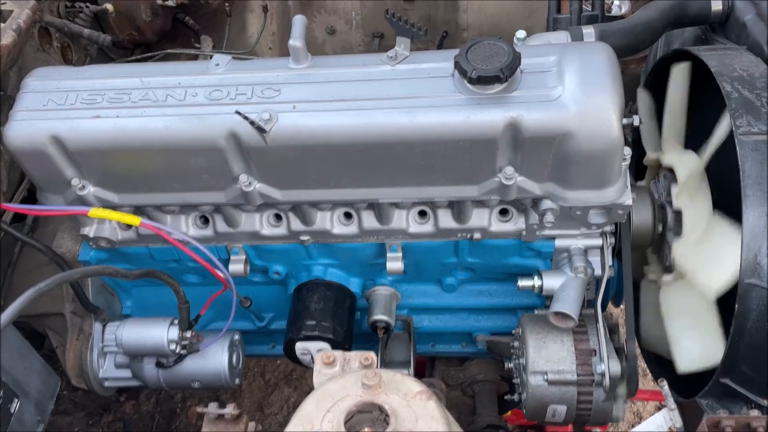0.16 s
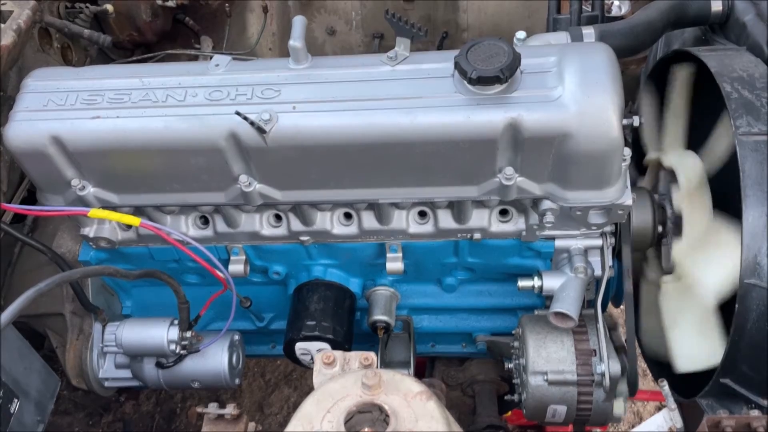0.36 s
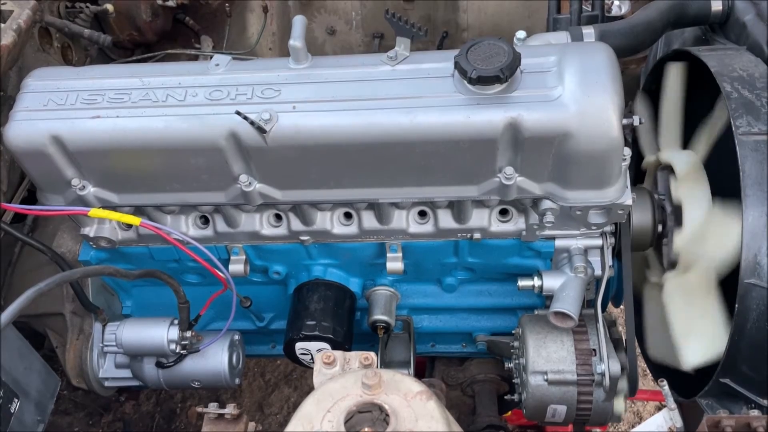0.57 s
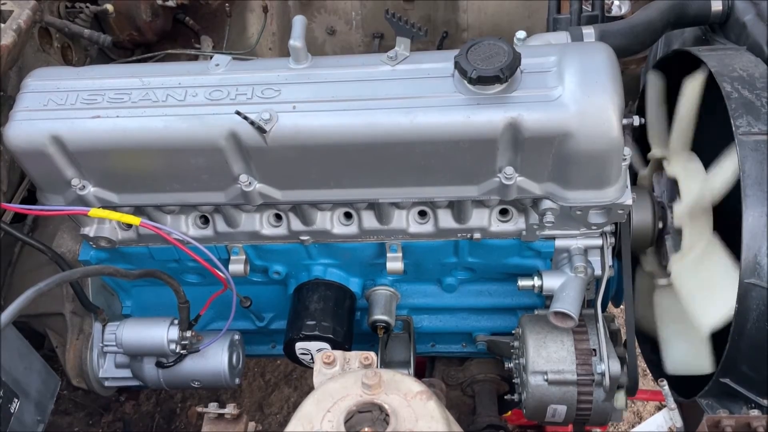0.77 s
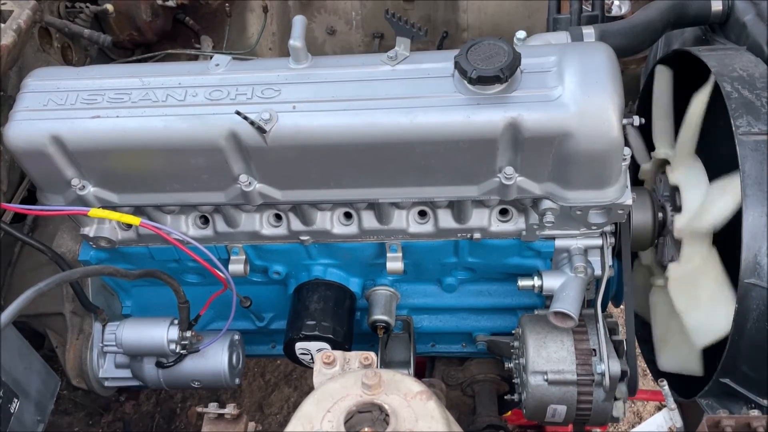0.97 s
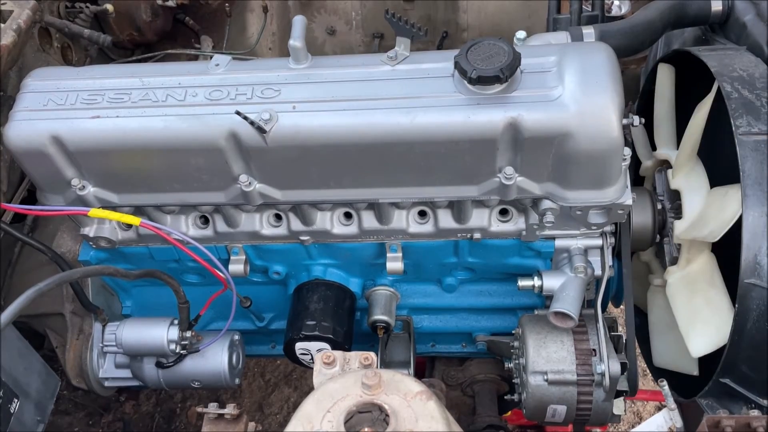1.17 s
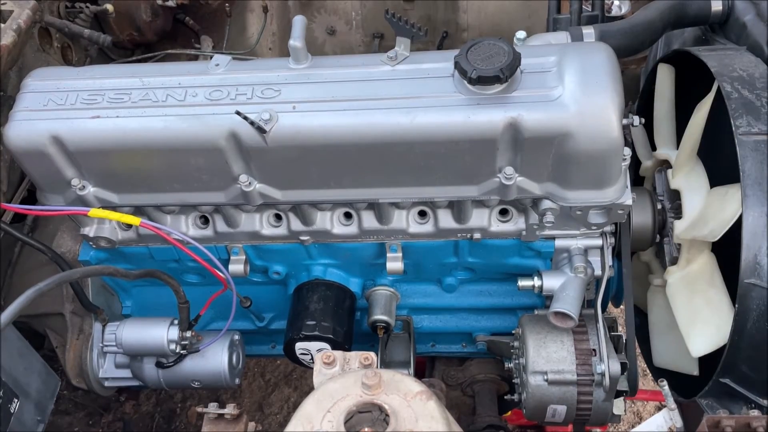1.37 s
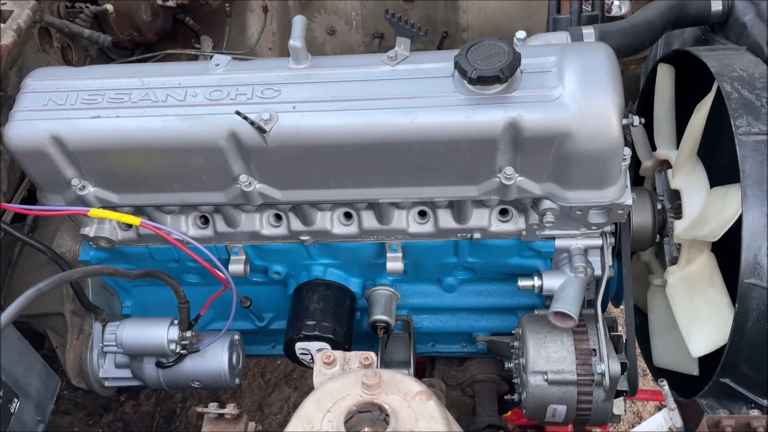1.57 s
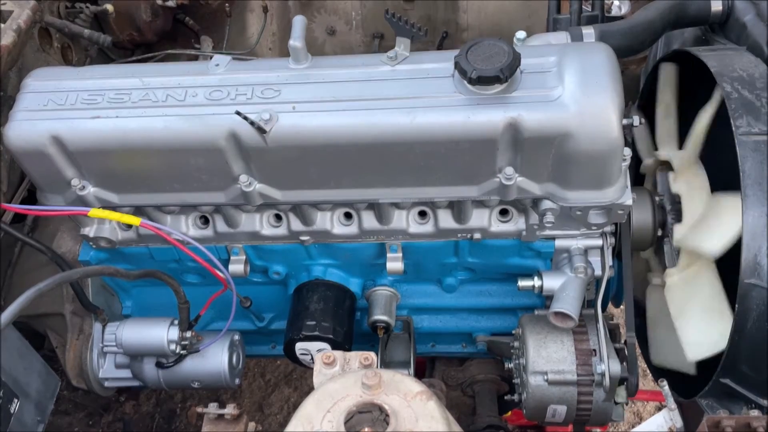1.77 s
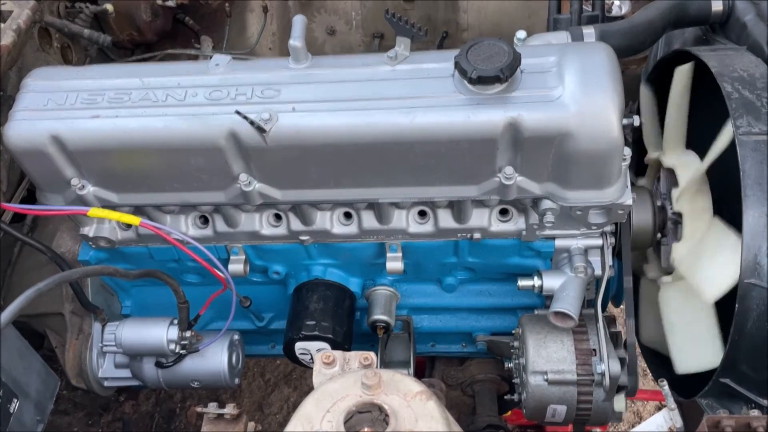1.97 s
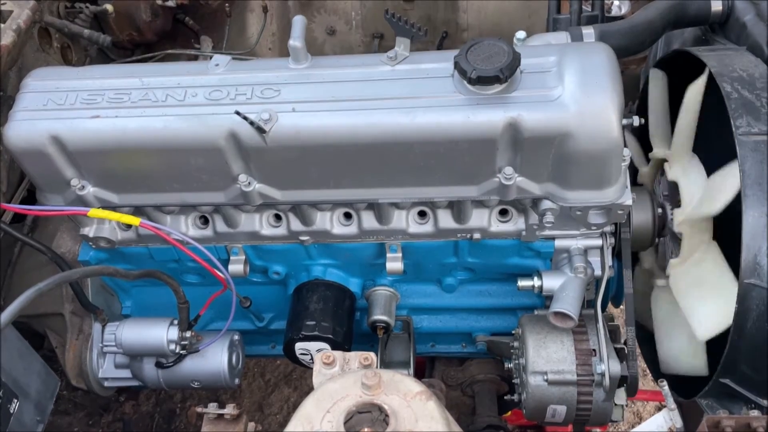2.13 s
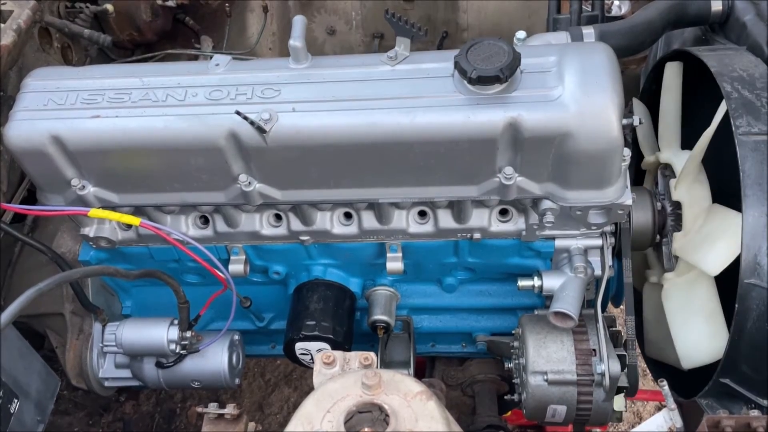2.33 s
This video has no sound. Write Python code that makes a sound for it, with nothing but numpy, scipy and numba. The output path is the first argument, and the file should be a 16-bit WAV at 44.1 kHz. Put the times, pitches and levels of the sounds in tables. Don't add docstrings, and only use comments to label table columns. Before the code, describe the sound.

Engine starter cranking in three bursts, hard metallic clacks and a grinding whine that coasts down

```python
import sys
import numpy as np
from scipy import signal
from scipy.fft import rfft, irfft
from scipy.io import wavfile
from scipy.ndimage import uniform_filter1d
from numba import njit

SR = 44100
rng = np.random.default_rng(int(sys.argv[2]) if len(sys.argv) > 2 else 0)


def transcribe(signal):
    frames = np.atleast_2d(signal).T
    limited = np.clip(frames, -1, 1)
    pcm = np.round(limited * 32767).astype(np.int16)
    wavfile.write(sys.argv[1], SR, pcm)


def attenuation_scalar(level_db):
    decades = np.asarray(level_db, float) / 20
    return 10 ** decades


N = 105840


@njit
def bandpass(x, hz, width):
    y, band, low = np.empty(len(x)), 0., 0.
    g, k = np.tan(np.pi * hz / SR), width / hz
    for i in range(len(x)):
        v = (band + g * (x[i] - low)) / (1 + g * (g + k))
        band, low, y[i] = 2 * v - band, low + 2 * g * v, k * v
    return y


def highpass(x, order, hz):
    return signal.sosfilt(signal.butter(order, hz, "high", fs=SR, output="sos"), x)


def unit(x):
    return x / np.sqrt(np.mean(x ** 2) + 1e-18)


def across(table, col):
    table = np.array(table, float)
    bins_hz = np.arange(N // 2 + 1) * SR / N
    return np.interp(np.log(bins_hz + 1), np.log(table[:, 0]), table[:, col])


def colour(x, table):
    return irfft(rfft(x) * attenuation_scalar(across(table, 1)), N)


def walk(rate):
    hold = int(SR / rate)
    steps = np.repeat(rng.standard_normal(N // hold + 1), hold)
    return 1.6 * uniform_filter1d(uniform_filter1d(steps, hold), hold)[:N]


def ring(x, table, widen, patchy_db=0):
    total = 0
    for k, (hz, width, db) in enumerate(table):
        swell = attenuation_scalar(db + patchy_db * walk(22))
        total = total + (-1) ** k * swell * bandpass(x, 1. * hz, width * widen) / np.sqrt(width)
    return total


def grit(spread_db):
    return unit(rng.standard_normal(N) * attenuation_scalar(spread_db * rng.exponential(size=N)))


# pitch_hz, level_db (per Hz)
ROOM_HUM = [(25, -14), (50, 1.5), (130, -10), (300, -15), (600, -24), (1300, -32), (2200, -51), (5000, -73)]


def room():
    mid, side = (colour(rng.standard_normal(N), ROOM_HUM) * attenuation_scalar(walk(12)) for _ in range(2))
    side = highpass(side, 2, 500) * attenuation_scalar(0.5)
    line = attenuation_scalar(-32) * unit(bandpass(rng.standard_normal(N), 1593., 27.))
    return attenuation_scalar(-46) * (np.array([mid + side, mid - side]) / np.std(mid) + line)


def garage(x):
    t60_s, level_db = 0.22, -16.5
    age = np.arange(SR // 2) / SR
    tail = rng.standard_normal((2, len(age))) * attenuation_scalar(-60 * age / t60_s) * (age > .004)
    mid, side = signal.lfilter([.3], [1, -.7], tail)
    side = highpass(side, 2, 500)
    tail = np.array([mid + side, mid - side])
    tail = tail / np.sqrt(np.sum(tail[0] ** 2))
    return attenuation_scalar(level_db) * signal.fftconvolve(x[None], tail, axes=1)[:, :N]


# start_s, level_db (peak)
FAINT_TICKS = [(0.0228, -58.5), (0.1211, -60.5), (0.18, -62.5), (1.2695, -62), (1.3109, -64), (1.4576, -54),
               (1.5618, -53.5), (1.6094, -73), (1.6846, -58)]


def ticks(t):
    env = sum(attenuation_scalar(db) * (t >= s) * np.exp(-np.clip(t - s, 0, 1) / 0.021) for s, db in FAINT_TICKS)
    n = rng.standard_normal(N)
    high = unit(bandpass(bandpass(n, 11200., 2500.), 11200., 2500.))
    return env * attenuation_scalar(-11) * (high + attenuation_scalar(-10) * unit(bandpass(n, 4800., 900.)))


# time_s, pitch_hz, level_db
BEARING = [
    (.83, 9200, -50),
    (.86, 10450, -46),
    (.885, 10500, -47),
    (.918, 9250, -40),
    (.932, 9050, -60),
]


def squeak(t):
    s, hz, db = np.array(BEARING, float).T
    level = attenuation_scalar(np.interp(t, s, db, -120, -120) + 2 * walk(120))
    return level * np.sin(2 * np.pi * np.cumsum(np.interp(t, s, hz)) / SR)


# pitch_hz, width_hz, level_db
BLOCK = [(106.5, 50, -5.5), (238, 100, 2.5), (326, 85, -1), (470, 90, -5.5), (763, 63, -6.5),
         (858, 77, -4.5), (1158, 39, -6), (1500, 230, -4)]
# start_s, level_db, fade_s
LOAD_GROANS = [
    (0.242, -27, 0.06),
    (.5, -38, 0.031),
    (0.692, -34, .08),
    (.97, -38.5, 0.072),
    (1.87, -35, 0.054),
    (2.198, -30, 0.034),
]
# start_s, level_db
CORE_PULLS = [
    (0.22, -45),
    (1.698, -45),
    (2.028, -43.5),
]


def groan(t):
    load = sum(attenuation_scalar(db) * np.clip((t - s) / 0.06, 0, 1) * np.exp(-np.clip(t - s, 0, 3) / fade)
               for s, db, fade in LOAD_GROANS)
    pull = sum(attenuation_scalar(db) * np.clip((t - s) / .012, 0, 1) * (t < s + .014) for s, db in CORE_PULLS)
    n = rng.standard_normal(N)
    return load * unit(ring(n, BLOCK[:4], widen=1.0)) + pull * unit(bandpass(n, 2800., 4000.))


# start_s, level_db (peak), rattle_ms, thump_db, top_db (treble of the crack)
PINION_BLOWS = [
    (0.2327, -5, 9, -14, -1),
    (0.5167, -6, 14, -18.5, 4.5),
    (1.7115, -5.5, 9, -16.5, 3),
    (1.7419, -14, 6.3, -4.5, -14.5),
    (1.7589, -9, 14, -15.5, 3),
    (1.7668, -29, 9, -7.5, 5),
    (2.0372, -5.5, 12, -13, 1.5),
    (2.0689, -7, 12, -11, 2.5),
    (2.0814, -21.5, 9, -21.5, -26),
    (2.0974, -40, 9, -12, -8),
]
# pitch_hz, width_hz, level_db
STEEL_RING = [(1550, 210, -9.5), (1847, 140, 2), (2024, 79, 4), (2472, 79, 5), (2757, 150, -2),
              (3190, 84, 3.5), (4520, 570, -12.5), (6060, 170, 1), (6756, 300, 2), (7600, 160, -0.5),
              (9350, 590, -5), (11500, 500, -18), (15700, 400, 3.5)]
# pitch_hz, level_db
IMPACT = [(300, -10.5), (1000, -10), (2200, -2), (4000, 3), (6600, 0), (10000, -2), (14500, -10.5),
          (15800, -14.5)]


def blows(t):
    sharp, push, top = np.zeros(N), np.zeros(N), np.zeros(N)
    ends = [b[0] for b in PINION_BLOWS[1:]] + [9]
    for (s, db, ms, thump_db, top_db), end in zip(PINION_BLOWS, ends):
        age = np.clip(t - s + 0.00092, 0, 1)
        rise = np.minimum(age / 0.0011, 1) ** 2
        sharp += attenuation_scalar(db) * rise * np.exp(-np.clip(age - ms / 1000, 0, 1) / 0.002 - age / 0.024)
        push += attenuation_scalar(db + thump_db) * (age / 0.0049) * np.exp(-age / 0.0067)
        top += attenuation_scalar(top_db) * (t >= s - .003) * (t < end - .003)
    x = grit(spread_db=2.5)
    steel = ring(x * sharp, STEEL_RING, widen=1.2) / np.std(ring(x, STEEL_RING, widen=1.6))
    crack = colour(x, IMPACT)
    hiss = highpass(crack, 2, 5200)
    crack = sharp * (crack + (top - 1) * hiss) / np.std(crack)
    n = rng.standard_normal(N)
    thump = ring(n * push, BLOCK, widen=0.71) / np.std(ring(n, BLOCK, widen=1.1))
    return attenuation_scalar(-8) * steel + attenuation_scalar(-13) * crack + thump


# time_s, pitch_hz (whine), level_db (grinding)
ARMATURE = [
    [(.236, 600.5, -35), (.3, 1099, -27), (.4, 1500, -26.5), (.51, 1757, -25.5), (.65, 1450, -30),
     (.77, 1167, -31), (1.05, 590.7, -31.5), (1.19, 333.5, -38.5), (1.3, 148, -75)],
    [(1.715, 801.4, -28.5), (1.78, 1500, -37), (1.83, 1330, -38), (1.88, 1183, -37), (1.96, 852.4, -35.5),
     (2.0, 720, -39), (2.035, 599, -44.5)],
    [(2.04, 812, -23), (2.1, 1330, -34), (2.17, 1080, -44), (2.225, 855, -38), (2.3, 580, -44),
     (2.36, 382.6, -48.5), (2.4, 250, -67.5)],
]
# pitch_hz, level_db (per Hz)
RUB = [(60, -26), (250, -8), (900, 4), (2500, -3.5), (5600, -10), (6800, -3), (9500, -15), (14000, -19.5)]
# pitch_hz, width_hz, level_db
CASE = [(233.7, 70, -2.5), (444, 32, -6.5), (589.4, 9.7, -3), (758, 50, -2), (894, 16, -5.5),
        (1187.5, 15, 10.5), (1455, 140, 3), (1715, 15, 7), (1940, 42, 6), (1965, 27, -2.5),
        (2667, 120, 5.5), (4360, 37, 5), (5140, 200, -0.5), (6150, 180, 4)]
WHINE_HARMONICS = [-13, -12, -16, -20]


def motor(t):
    turns_div = 10.5
    rows = np.concatenate([np.array(b, float) for b in ARMATURE])
    on = sum((t >= b[0][0]) & (t <= b[-1][0]) for b in ARMATURE)
    hz = uniform_filter1d(np.interp(t, rows[:, 0], rows[:, 1]), 800)
    gain = attenuation_scalar(np.interp(t, rows[:, 0], rows[:, 2])) * uniform_filter1d(1. * on, 300)
    phase = 2 * np.pi * np.cumsum(hz * (1 + 0.0066 * walk(40))) / SR

    rub = grit(spread_db=2) * (1 + 0.21 * np.sin(phase / turns_div))
    body = unit(colour(rub, RUB)) + attenuation_scalar(-6) * unit(ring(rub, CASE, widen=1.2, patchy_db=3))
    top = highpass(body, 1, 2400)
    dull = attenuation_scalar(18.5 * np.log2(np.minimum(hz / 720, 1)) + walk(22))

    whine = sum(attenuation_scalar(db + 3.5 * walk(28)) * np.sin((k + 1) * phase) for k, db in enumerate(WHINE_HARMONICS))
    whine = signal.sosfilt(signal.butter(2, 2500, fs=SR, output="sos"), whine)
    whine = .9 * whine + .6 * np.std(whine) * unit(ring(whine, CASE, widen=2))
    shaft = attenuation_scalar(-16 + 5.4 * walk(25)) * np.sin(phase / turns_div) * np.minimum(hz / 1200, 1) ** 2
    return gain * attenuation_scalar(.5 * walk(40)) * (body - top + dull * top + whine + shaft)


# pitch_hz, level_db, phase_rad, unrelated_share (0 to 1)
MIC_PORTS = [(280, 0, 0, .04), (600, -2, 0, .5), (1200, -5, -.6, .8), (2500, -6, -.3, .65),
             (5500, -3, -.4, .3), (8400, 0, 3.14, .02), (11000, 0, 6.2, .2), (15000, 0, 8.6, .3)]


def right_port(src):
    age = np.arange(3000)
    near = rng.standard_normal(3000) * np.exp(-age / 600)
    echo = rfft(near, N) / np.sqrt(np.sum(near ** 2))
    share = np.clip(across(MIC_PORTS, 3), 0, 1)
    path = np.sqrt(1 - share ** 2) * np.exp(-1j * across(MIC_PORTS, 2)) + share * echo
    return irfft(rfft(src) * attenuation_scalar(across(MIC_PORTS, 1)) * path, N)


def scene():
    t = np.arange(N) / SR
    src = ticks(t) + squeak(t) + groan(t) + blows(t) + motor(t)
    return attenuation_scalar(3.5) * (np.array([src, right_port(src)]) + garage(src)) + room()


def band_limit(x):
    return signal.sosfilt(signal.butter(12, 16480, fs=SR, output="sos"), x)


def record(dry):
    return band_limit(dry)


dry = scene()
out = record(dry)
transcribe(out)
```